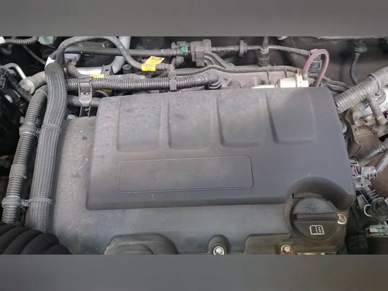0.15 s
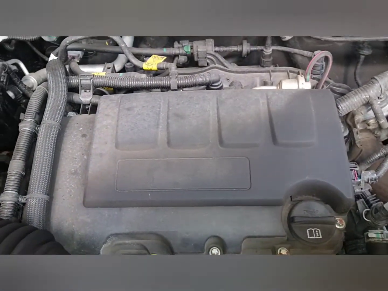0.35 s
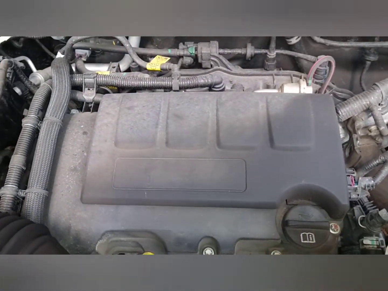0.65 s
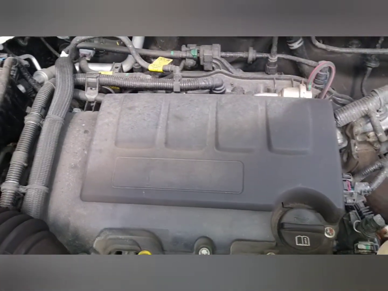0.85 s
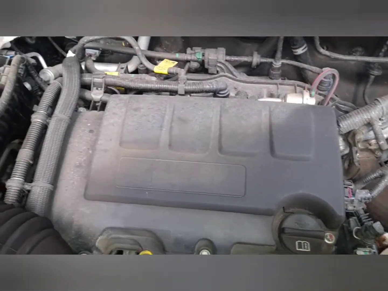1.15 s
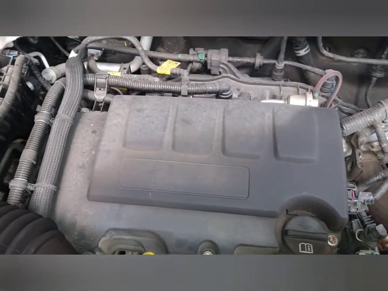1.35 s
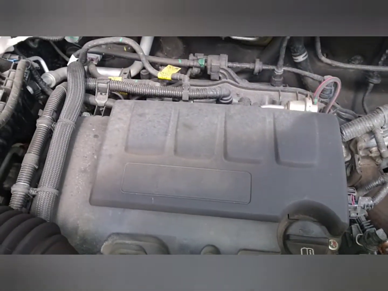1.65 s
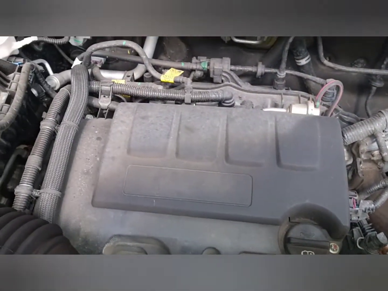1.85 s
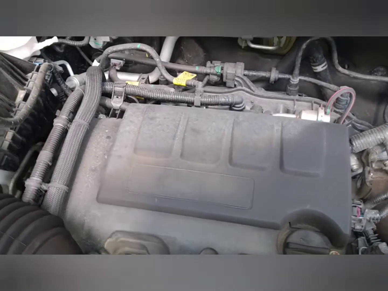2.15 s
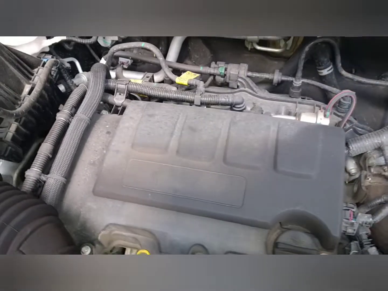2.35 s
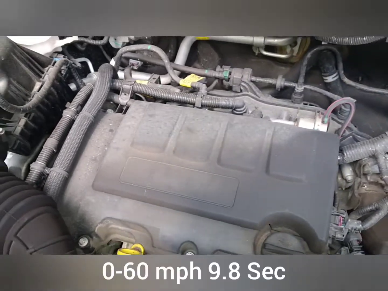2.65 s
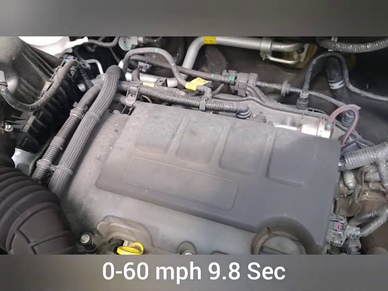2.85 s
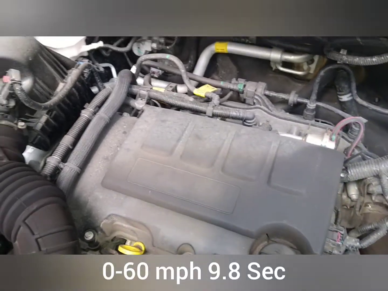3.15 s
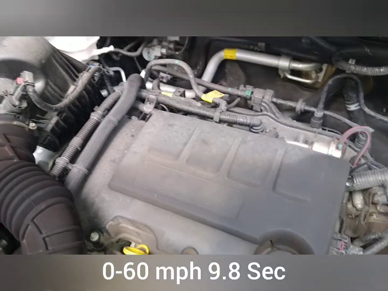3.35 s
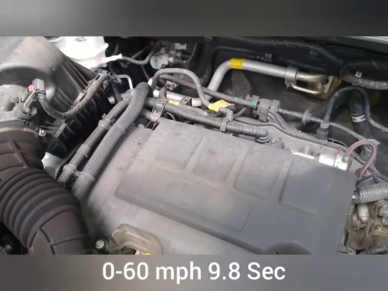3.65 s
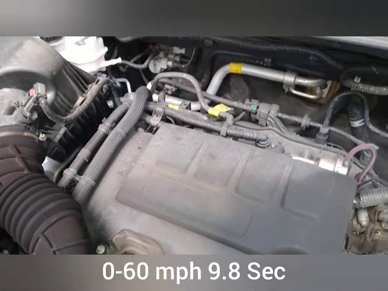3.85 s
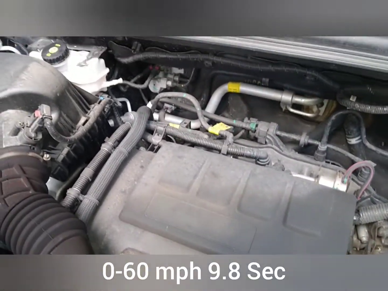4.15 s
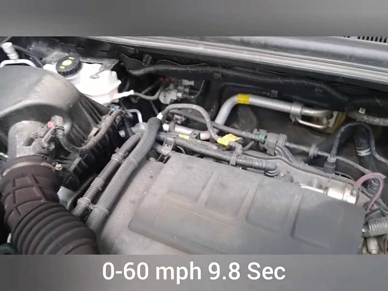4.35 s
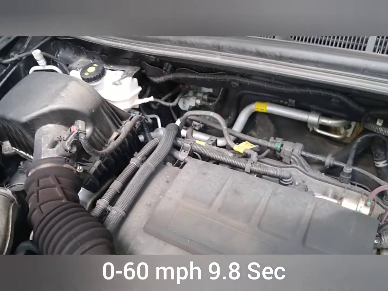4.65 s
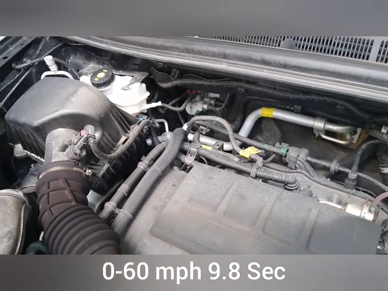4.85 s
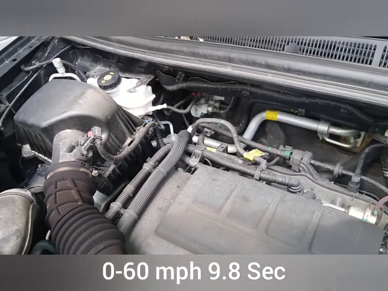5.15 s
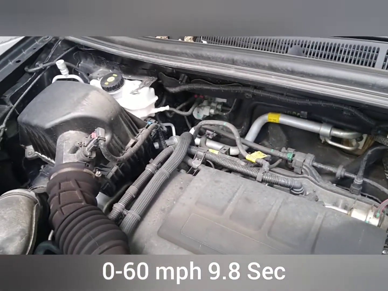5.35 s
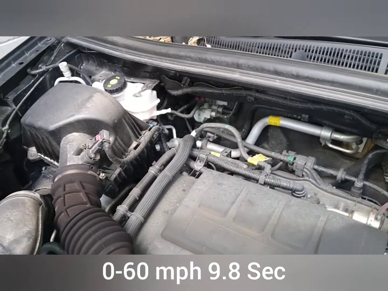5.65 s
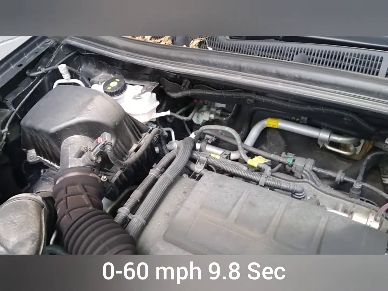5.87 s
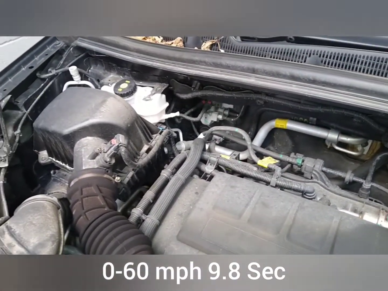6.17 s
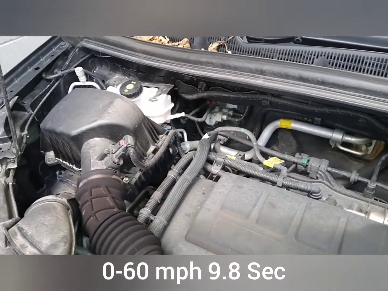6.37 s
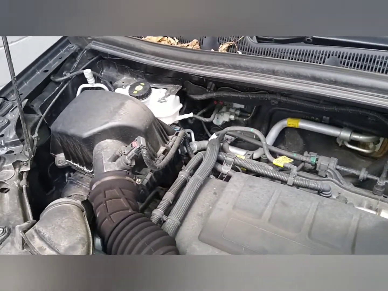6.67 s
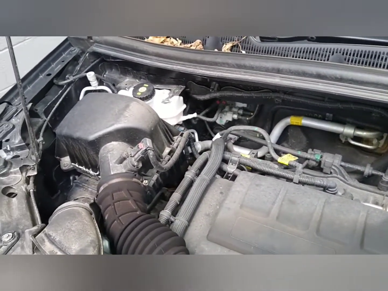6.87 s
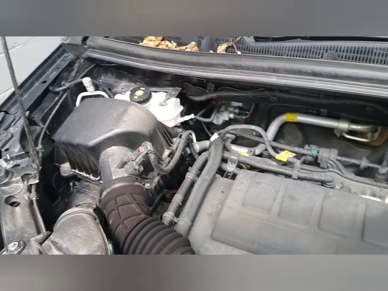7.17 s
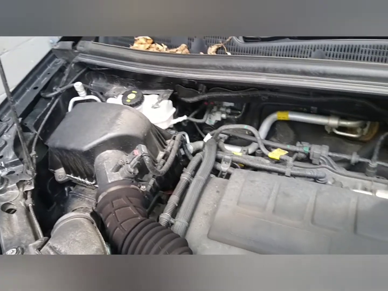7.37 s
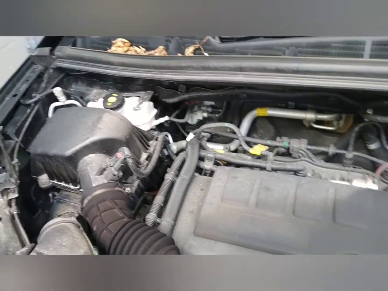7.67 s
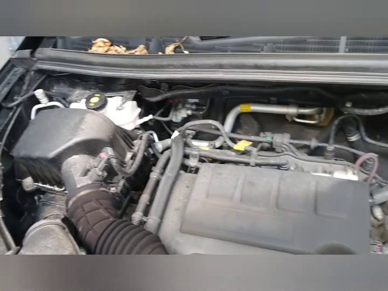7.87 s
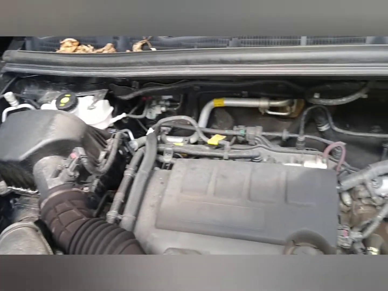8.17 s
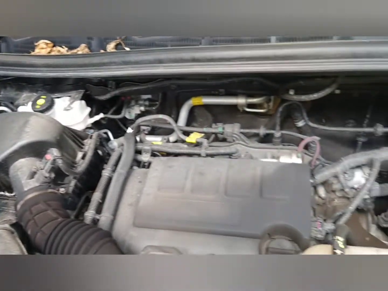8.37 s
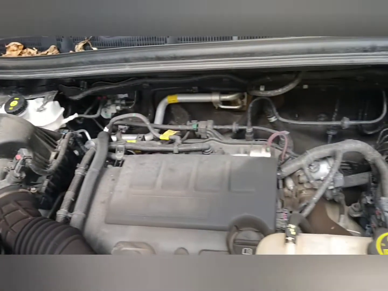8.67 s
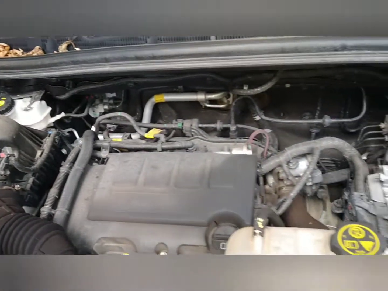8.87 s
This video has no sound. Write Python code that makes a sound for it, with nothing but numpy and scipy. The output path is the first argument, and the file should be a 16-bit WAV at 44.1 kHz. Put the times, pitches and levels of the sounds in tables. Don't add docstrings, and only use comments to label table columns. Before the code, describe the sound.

Close under an open bonnet, a petrol engine ticks and hums at idle; early wind buffets, later rapid pulsing ticks and one hard metal snap.

```python
import sys
import numpy as np
from scipy import signal
from scipy.io import wavfile
from scipy.ndimage import uniform_filter1d

SR = 44100
rng = np.random.default_rng(int(sys.argv[2]) if len(sys.argv) > 2 else 0)


def unload_audio(sound):
    columns = np.transpose(np.atleast_2d(sound))
    steps = np.round(np.clip(columns, -1, 1) * 32767)
    wavfile.write(sys.argv[1], SR, steps.astype(np.int16))


def makeup_ratio(level_db):
    decades = np.asarray(level_db, float) / 20
    return 10 ** decades


N = 397385
TIME = np.arange(N) / SR

CYCLES_PER_S, FIRST_CYCLE = 6.25, 0.94
MAX_CYCLES = 58
# (time [s], lead [crank deg])
IDLE_LEAD = [(0, 2), (.55, 14), (1.28, -4), (1.92, -4), (2.56, 7), (3.2, 28), (3.7, 35), (4.16, 28),
             (4.7, 15), (5.12, 19), (5.44, 15), (7.04, 45), (8, -12), (8.32, 6), (8.64, 46), (9.01, 51)]
# (time [s], place [0-2], hiss level [dB])
MIC_PATH = [
    (0, .5, -28.5),
    (.6, 0.36, -29.5),
    (1.2, 0.35, -30.5),
    (2.5, 0.79, -32),
    (4, 1.03, -33),
    (5.6, 0.9, -33),
    (7.6, 1.31, -34.5),
    (8, 1.9, -37.5),
    (9.01, 2.2, -38.5),
]
# (frequency [Hz], density at places 0, 1, 2 [dB per Hz], left-right likeness [0-1])
BAY_COLOUR = [(45.8, -9, -6, -1, 0.93), (105.4, 1, 9, 16.5, 1), (204, -11, -3.5, 4, 1),
              (386, -5, -11, -2.5, 0.71), (560, 6.5, -1, 2.5, 0.99), (920, -6.5, -2, 1, 0.89),
              (1250, -5.5, 0, 6, 0.32), (1740, -5.5, -4.5, 5.5, 0.18), (2435, -8.5, -2.5, 1.5, 0.023),
              (3570, -17, -28.5, -25, .01), (5210, -3.5, -14.5, -9, .01), (7150, -11, -3.5, -3.5, .01),
              (10200, -9.5, -9, -8, .01), (16000, -14, -18.5, -16, .01)]
# (frequency [Hz], width [Hz], level over noise at places 0, 1, 2 [dB])
COVER_RINGS = [(331, 47, -14, -8.5, 5), (817, 12.3, 15.5, 4.5, 1), (921, 71, 18.5, -5, -14),
               (1204, 31, -21, -9, 1.5), (1533, 29, 7, 6.5, -11), (1780, 87, -9, 1, -15),
               (2286, 53, 23, -14, -16), (3988, 138, 17, 4.5, 5.5), (6050, 120, -1, 0.5, -40),
               (6530, 76, -31, 8, -36), (7070, 450, -23, -5, -2), (7430, 46, 7, 8.5, -3),
               (8160, 73, -48, 2.5, -14), (8790, 66, -8, 3.5, -12), (8570, 1800, 9.5, -19.5, -12),
               (11630, 490, -8, 0, -10), (15800, 95, -12, 4, 5)]
# (angle [crank deg], level over hiss [dB], centre [Hz], width [octaves], t60 [s], L-R [dB])
VALVE_TICKS = [(25, 8, 11700, 0.85, 0.029, 5), (167.4, 16.5, 16800, 1.62, 0.015, 0.5),
               (338, 13.5, 18700, 1.75, 0.028, 1), (386, 12, 3850, 0.6, 0.024, -4.5),
               (407.6, 9, 4560, 0.98, 0.03, 0), (509.6, 12, 12600, 1.35, 0.039, 1),
               (691, 12.5, 7400, 1.68, 0.028, 0), (249, 9.5, 1470, 0.19, 0.031, 5),
               (402, 8, 11000, 0.7, 0.016, 8), (633, 7.5, 1760, 0.13, 0.042, -5)]
# (level at places 0, 1, 2 [dB])
SIGHT_DB = (-0.5, 0.28, -0.5)
# (L-R at places 0, 1, 2 [dB])
SHADOW_DB = (1, -4, -2.5)
# (angle [crank deg], level [dB], sign [+1 or -1])
BLOCK_THUDS = [(23.92, -5.5, 1), (75.33, -2, 1), (151.54, -5, -1), (206.4, -7.5, 1), (256.8, -11.5, -1),
               (323.1, -5.5, 1), (395, -4, -1), (435, -6, 1), (520, -4.5, 1), (580, -7, -1), (656.5, -9, 1),
               (675, -2.5, -1)]
# (frequency [Hz], level [dB], t60 [s])
BLOCK_MODES = [(544, -6.5, 0.19), (586, 3.5, 0.16), (601.6, 5.5, 0.11), (817, -6, 0.19)]
# (angle [crank deg], frequency [Hz], t60 [s], peak at places 0, 1, 2 [dB], L-R [dB])
PART_KNOCKS = [(262, 1750, 0.046, -37, -30, -44, -4.5), (628, 1731, 0.017, -33, -29, -31, -3),
               (78, 1700, 0.023, -35, -36, -36, -9), (31.76, 1700, 0.014, -35, -31.5, -47, -4),
               (409, 2820, 0.022, -40, -34, -56, 12.5), (159, 7430, 0.063, -47, -35.5, -41, -7),
               (340, 8290, 0.028, -38, -22, -36, 2), (397, 6580, 0.015, -29, -25.5, -51, -12.5),
               (713.4, 7430, 0.018, -33, -39, -31, -14), (532, 8900, 0.039, -35, -33.5, -35, 3)]
# (time [s], peak level [dB])
PLATE_SLAPS = [
    (8.019, -27),
    (8.0222, -18),
    (8.0244, -13),
    (8.029, -15),
    (8.035, -22),
]
# (frequency [Hz], level [dB], t60 [s])
PLATE_MODES = [(510, -4.5, 0.054), (603, -3, 0.13), (790, -8, 0.03), (940, -15, 0.031), (1180, 0, 0.076),
               (1365, -1, 0.07), (1480, -3.5, 0.066), (2124, -3, 0.042), (1770, -12, .05),
               (2640, -14, 0.029), (5900, -6, 0.033), (6800, -5, 0.019), (9830, -19, .1)]
# (time [s], level [dB])
WHINE_LEVEL = [(0, -52), (1.4, -61), (2.0, -57), (5.2, -55), (5.7, -63), (9.01, -61)]
# (time [s], level [dB], L-R [dB])
BAY_BREEZE = [(0, -39, -7), (.27, -44.5, -12), (.68, -37, -5), (.9, -34.5, 13), (1, -35, -27),
              (1.13, -40, 0), (2.36, -40.5, -12), (3.06, -48, 1), (3.7, -54, 3), (4.3, -49.5, 0),
              (4.84, -49, 3), (5.4, -44, -4), (6.05, -45.5, 5), (6.27, -41.5, -10), (7.05, -48.5, -3),
              (9.01, -48.5, -7)]
# (time [s], level at the port hit harder [dB], length [ms], L-R [dB])
WIND_PUFFS = [(0.287, -21.5, 18, -20), (.378, -20.5, 25, -30), (.441, -17, 30, -21), (0.473, -17, 13, -25),
              (.504, -21, 27, -10), (.629, -15.5, 20, -9), (.672, -18.5, 18, -15), (.706, -14.5, 22, 7),
              (.746, -14.5, 40, -24), (.789, -25, 13, 25), (.83, -29, 45, 25), (.898, -21, 16, 25),
              (.935, -30, 28, 3), (0.989, -2, 40, -37), (1.083, -29.5, 31, -25), (1.425, -28.5, 24, 7),
              (1.682, -17, 11, -30), (1.7, -17, 33, -28), (1.749, -30, 20, 4), (1.821, -26.5, 47, -17),
              (2.096, -23.5, 11, -25), (2.141, -21.5, 7, -25), (2.31, -38, 30, -25), (5.429, -34, 17, -25),
              (5.5, -34, 17, -25), (6.085, -26, 17, 25), (6.103, -25, 12, 25), (6.184, -29, 15, 25),
              (6.526, -19, 13, -27)]

BLOCK_NEAR_DB, BLOCK_FAR_DB = -29, -36
LEAVE_S, LEAVE_LENGTH_S = 1.25, 0.6
ENGAGE_S, LOAD_DB, LOAD_FADE_S = 8.03, 4.5, 0.37
PURGE_START_S, PURGE_PERIOD_S, PURGE_DB = 7.0641, 0.06256, 15.5
DRONE_HZ, DRONE_DB, UNDERTONE_DB = 98.5, -41.5, -48
WHINE_HZ = 9999.5
CALM_DB, RUMBLE_FOLLOWS = -46.5, 0.6
PORT_DB, PORT_FOLLOWS = -52, 1.47


def rms_one(x):
    return x / np.sqrt(np.mean(x ** 2) + 1e-20)


def in_time(rows):
    s, *columns = np.transpose(rows)
    return [np.interp(TIME, s, c) for c in columns]


def by_place(place, levels_db):
    return np.interp(place, [0, 1, 2], levels_db)


def butter(x, hz, kind, order=2):
    return signal.sosfilt(signal.butter(order, hz, kind, fs=SR, output="sos"), x)


def drift(rate):
    r = np.exp(-80 * np.pi * rate / SR)
    slow = signal.lfilter([1], [1, -2 * r, r * r], rng.standard_normal(N // 40 + 2002))[2000:]
    return np.interp(np.arange(N) / 40, np.arange(len(slow)), rms_one(slow))


def strikes(times, sizes):
    out, inside = np.zeros(N), (times >= 0) & (times < TIME[-1])
    out[(times[inside] * SR).astype(int)] = (sizes * np.ones(len(times)))[inside]
    return out


def ring(clicks, hz, t60):
    r, w = makeup_ratio(-60 / (t60 * SR)), 2 * np.pi * hz / SR
    return signal.lfilter([0, np.sin(w)], [1, -2 * r * np.cos(w), r * r], clicks + 1e-18)


def burst(clicks, t60, rise_s):
    fall, rise = makeup_ratio(-60 / (t60 * SR)), np.exp(-1 / (rise_s * SR))
    dying = signal.lfilter([1], [1, -fall], clicks + 1e-18)
    return signal.lfilter([1 - rise], [1, -rise], dying)


def crank_times(degrees):
    coarse = TIME[::100]
    cycles = FIRST_CYCLE + CYCLES_PER_S * coarse + in_time(IDLE_LEAD)[0][::100] / 720
    return np.interp(np.arange(MAX_CYCLES) + degrees / 720, cycles, coarse, left=-1, right=-1)


def metal_contacts(place):
    gates = []
    for degrees, tick_db, hz, octaves, t60, side_db in VALVE_TICKS:
        at = crank_times(degrees) + rng.normal(0, 0.0003, MAX_CYCLES)
        uneven_db = rng.normal(0, 1.2, MAX_CYCLES)
        sight_db = by_place(np.interp(at, TIME, place), SIGHT_DB)
        sizes = makeup_ratio(tick_db + 3 + uneven_db + sight_db)
        gates.append(burst(strikes(at - 0.001, sizes), t60, rise_s=0.0019))
    purge_at = PURGE_START_S + PURGE_PERIOD_S * np.arange(32)
    purge_db = PURGE_DB + rng.normal(0, 1.5, 32)
    gates.append(burst(strikes(purge_at, makeup_ratio(purge_db)), 0.025, rise_s=0.0008))
    slap_at, slap_db = np.transpose(PLATE_SLAPS)
    gates.append(burst(strikes(slap_at, makeup_ratio(slap_db + 35.5)), 0.024, rise_s=0.00077))
    return np.array(gates, np.float32) ** 2


def covers_and_pipes(noise, place):
    rings = 0
    for hz, width_hz, *levels_db in COVER_RINGS:
        r = np.exp(-np.pi * width_hz / SR)
        poles = [1, -2 * r * np.cos(2 * np.pi * hz / SR), r * r]
        resonance = signal.lfilter([(1 - r * r) / 2, 0, (r * r - 1) / 2], poles, noise)
        rings = rings + makeup_ratio(by_place(place, levels_db) + 2.2 * drift(0.8)) * resonance
    return rings


def valve_gear(place, pan_db):
    swell_db = RUMBLE_FOLLOWS * (in_time(BAY_BREEZE)[0] - CALM_DB)
    gates = metal_contacts(place)
    contacts = np.array([row[2:] for row in VALVE_TICKS] + [(8950, 1.0, 0, 0), (4700, 1.37, 0, 0)])
    sides = makeup_ratio(np.outer([1, -1], contacts[:, 3]))
    colour = np.array(BAY_COLOUR)
    white = rng.standard_normal((2, 2, N))
    edges = 35 * 2 ** (np.arange(28) / 3)
    out = 0
    for k, (low, high) in enumerate(zip(edges, edges[1:])):
        hz = np.sqrt(low * high)
        *levels_db, alike = [np.interp(np.log(hz), np.log(colour[:, 0]), c) for c in colour.T[1:]]
        alike = np.clip(alike, 0, 1)
        mid, side = white[k % 2]
        ports = np.sqrt(1 + alike) * mid + np.sqrt(1 - alike) * side * [[1], [-1]]
        share = makeup_ratio(-12 * (np.log2(hz / contacts[:, 0]) / contacts[:, 1]) ** 2)
        if hz > 500:
            ports = ports * np.sqrt(1 + (share * sides).astype(np.float32) @ gates)
        lean = np.clip(np.log2(hz / 700) / 3, 0, 1) * pan_db / 2
        gain_db = by_place(place, levels_db) + 0.64 * drift(7.3) + lean * [[1], [-1]]
        gain_db = gain_db + swell_db * (hz < 170)
        out = out + makeup_ratio(gain_db) * butter(ports, [low, high], "band")
    left, right = (out + covers_and_pipes(out, place)) * makeup_ratio(3)
    return np.array([left, np.roll(right, 5)])


def block():
    thuds = 0
    for degrees, thud_db, sign in BLOCK_THUDS:
        at = crank_times(degrees) + rng.normal(0, 0.000088, MAX_CYCLES)
        sizes = np.sign(sign) * makeup_ratio(thud_db + rng.normal(0, 1, MAX_CYCLES))
        thuds = thuds + strikes(at, sizes)
    soft = butter(thuds, [430, 850], "band")
    return rms_one(sum(makeup_ratio(db) * ring(soft, hz, t60) for hz, db, t60 in BLOCK_MODES))


def knocks(place, hiss_db):
    out = np.zeros((2, N))
    for degrees, hz, t60, near_db, mid_db, far_db, side_db in PART_KNOCKS:
        at = crank_times(degrees) + rng.normal(0, 0.0004, MAX_CYCLES)
        sizes = makeup_ratio(rng.normal(0, 3, MAX_CYCLES))
        bounce_at = at + rng.uniform(0.001, 0.003, MAX_CYCLES)
        blow = strikes(at, sizes) + strikes(bounce_at, 0.13 * sizes)
        level_db = by_place(place, [near_db, mid_db, far_db]) + hiss_db + 32.5
        part = ring(blow, hz, t60) * makeup_ratio(level_db)
        out += [part * makeup_ratio(side_db / 2), np.roll(part, 5) * makeup_ratio(-side_db / 2)]
    return out


def clutch():
    at, slap_db = np.transpose(PLATE_SLAPS)
    luck = rng.normal(0, 1, (len(at), len(PLATE_MODES), 2))
    out = 0
    for k, (hz, db, t60) in enumerate(PLATE_MODES):
        sign = np.sign(luck[:, k, 0])
        hits = [strikes(at, makeup_ratio(slap_db + db - 6.5 + 2.0 * luck[:, k, c]) * sign) for c in (0, 1)]
        out = out + ring(np.array(hits), hz, t60)
    return out * makeup_ratio([[-1.5], [1.5]])


def tone(hz, db, wobble_db):
    return np.sqrt(2) * makeup_ratio(db + wobble_db * drift(2.7)) * np.sin(2 * np.pi * hz * TIME)


def intake_drone():
    drone_gate = np.interp(TIME, (7.3, 7.5, 8.17, 8.3), [0, 1, 1, 0])
    undertone_gate = np.interp(TIME, (6.85, 7.5, 8.2, 8.4), [0, 1, 1, 0])
    drone = drone_gate * tone(DRONE_HZ, DRONE_DB, wobble_db=3.0)
    return drone + undertone_gate * tone(DRONE_HZ / 2, UNDERTONE_DB, wobble_db=-2.0)


def control_unit():
    return tone(WHINE_HZ, in_time(WHINE_LEVEL)[0], wobble_db=-2.5) * makeup_ratio([[0.1], [2.0]])


def wind(breeze_db, puffs):
    power = makeup_ratio(2 * (breeze_db + 2 + 3.0 * drift(5.5)))
    for s, db, length_ms in puffs:
        near = slice(max(0, int((s - 0.1) * SR)), int((s + 0.1) * SR))
        late = (TIME[near] - s) * 1e3 / length_ms + 0.2
        power[near] += makeup_ratio(2 * (db + 3)) * np.exp(-(late * np.where(late < 0, 5, 1.6)) ** 2)
    power = power / (1 + power / makeup_ratio(-22))
    eddies = butter(rng.standard_normal(N), [68, 170], "band")
    eddies = eddies / np.sqrt(uniform_filter1d(eddies ** 2, size=600))
    flow = butter(np.sqrt(power) * eddies, 230, "low")
    spikes = butter(7.6 * np.abs(flow) ** 2.73, 1000, "low")
    fine = rms_one(butter(rng.standard_normal(N), [220, 650], "band"))
    small = 1.43 * power * fine
    return 0.8 * np.tanh(butter(flow + spikes + small, 55, "high") / 0.8)


def wind_at_ports():
    breeze_db, side_db = in_time(BAY_BREEZE)
    port_db = PORT_DB + PORT_FOLLOWS * (breeze_db - CALM_DB)
    gusts = []
    for side in (1, -1):
        puffs = [(s, db + min(0, side * lr_db), ms) for s, db, ms, lr_db in WIND_PUFFS]
        gusts.append(wind(port_db + side * side_db / 2, puffs))
    return np.array(gusts)


def scene():
    place, hiss_db = in_time(MIC_PATH)
    load_db = LOAD_DB * (TIME > ENGAGE_S) * np.exp(-np.abs(TIME - ENGAGE_S) / LOAD_FADE_S)
    hiss_db = hiss_db + load_db
    gear = makeup_ratio(hiss_db) * valve_gear(place, by_place(place, SHADOW_DB))
    block_db = np.interp(TIME, [LEAVE_S, LEAVE_S + LEAVE_LENGTH_S], [BLOCK_NEAR_DB, BLOCK_FAR_DB])
    body = makeup_ratio(block_db - 6) * block()
    body = np.array([body, np.roll(body, 7)])
    engine = gear + body + knocks(place, hiss_db)
    return engine + clutch() + intake_drone() + control_unit() + wind_at_ports()


def low_pass(x):
    return signal.sosfilt(signal.butter(12, 16100, fs=SR, output="sos"), x)


def record(dry):
    bass_cut = butter(dry, 45, "high")
    top_cut = signal.cheby2(20, 50, 16150, fs=SR, output="sos")
    finished = signal.sosfilt(top_cut, bass_cut)
    return low_pass(finished)


dry = scene()
out = record(dry)
unload_audio(out)
```